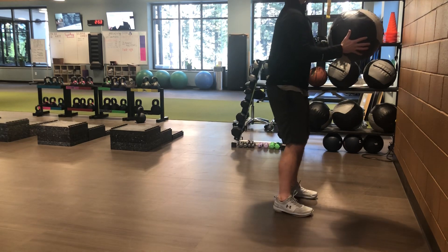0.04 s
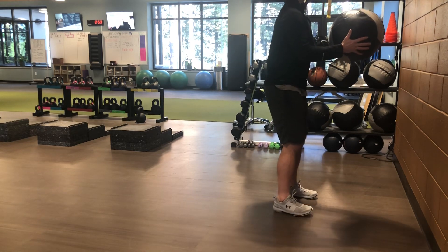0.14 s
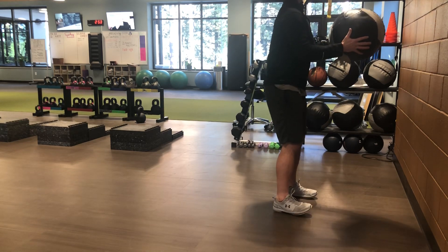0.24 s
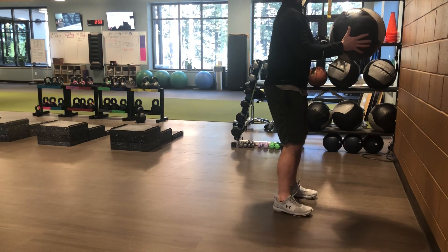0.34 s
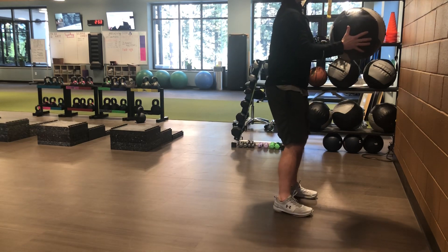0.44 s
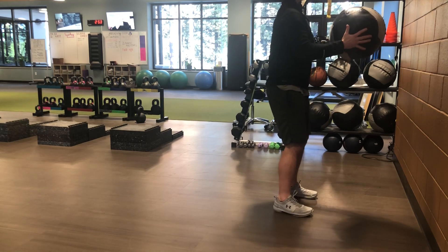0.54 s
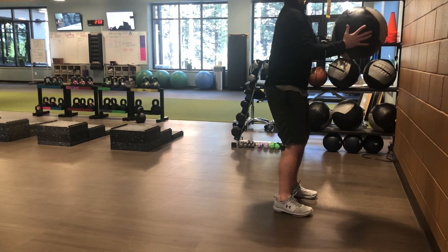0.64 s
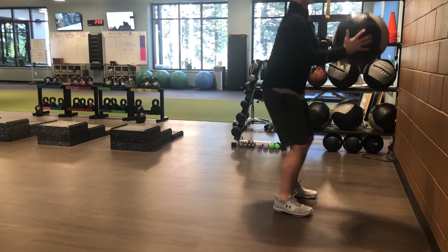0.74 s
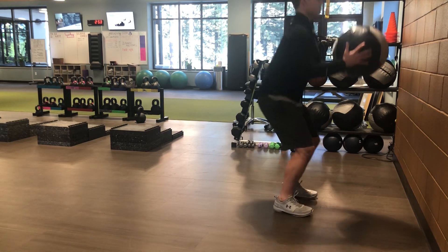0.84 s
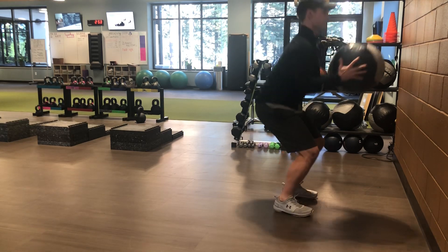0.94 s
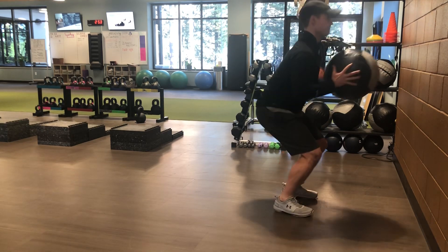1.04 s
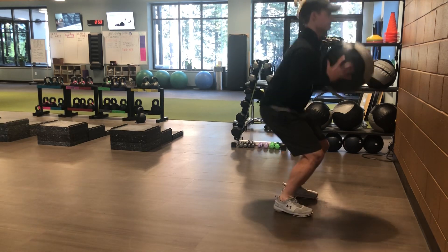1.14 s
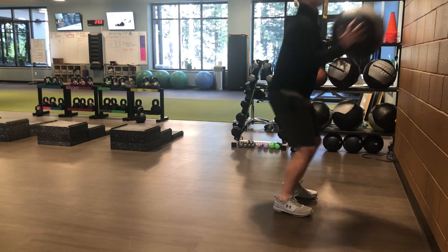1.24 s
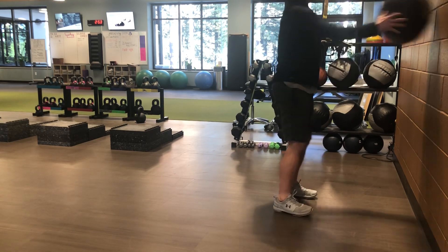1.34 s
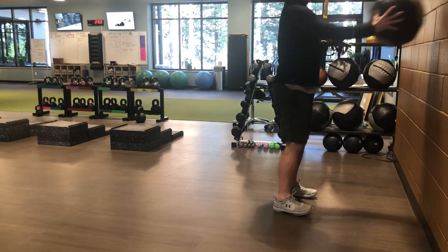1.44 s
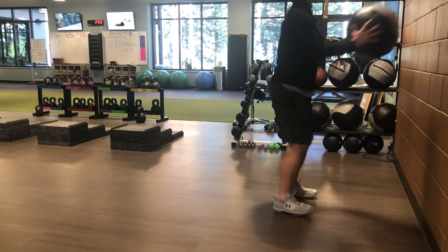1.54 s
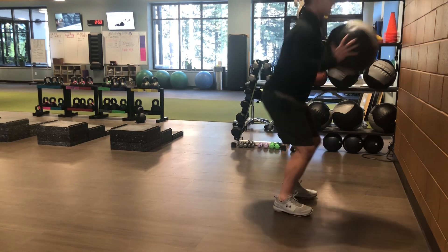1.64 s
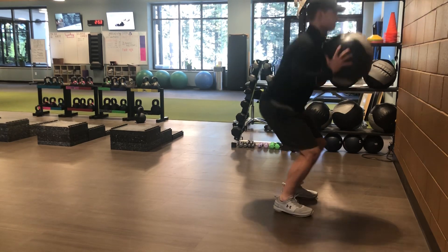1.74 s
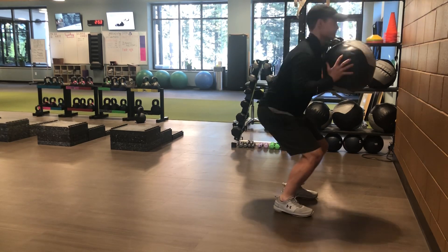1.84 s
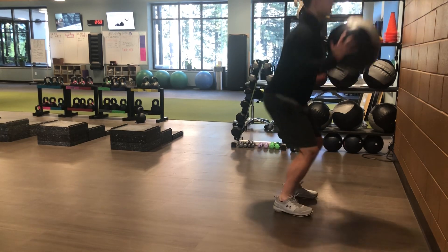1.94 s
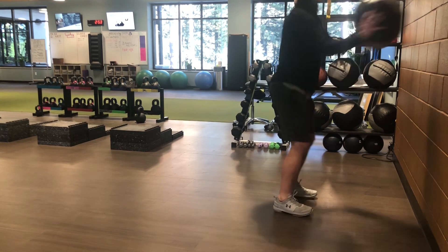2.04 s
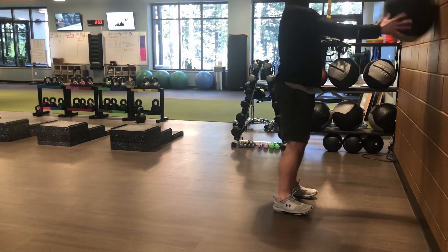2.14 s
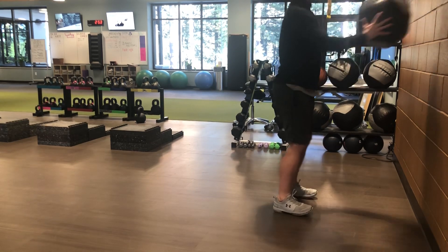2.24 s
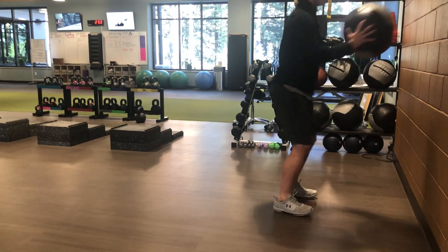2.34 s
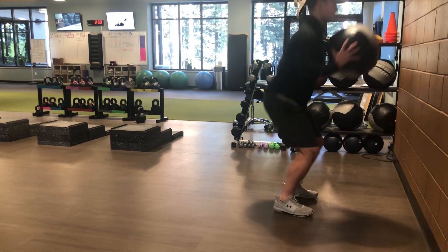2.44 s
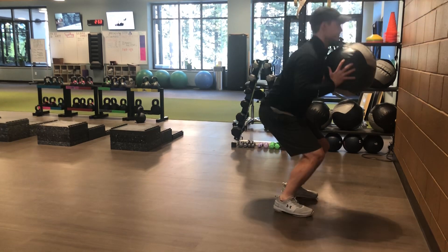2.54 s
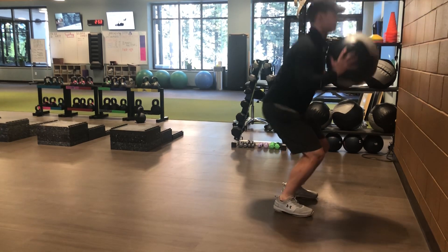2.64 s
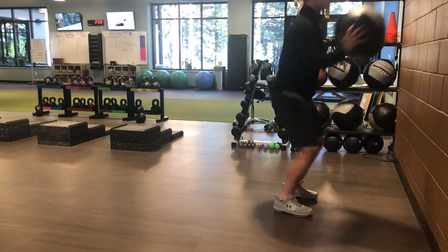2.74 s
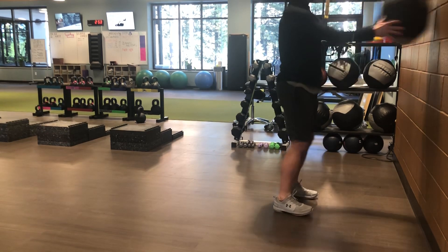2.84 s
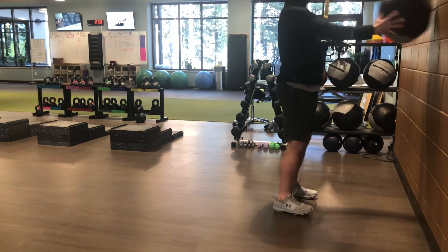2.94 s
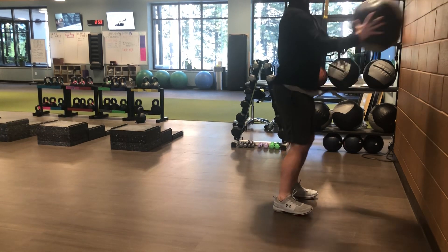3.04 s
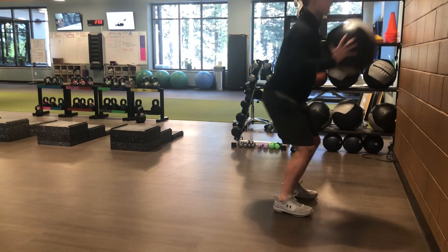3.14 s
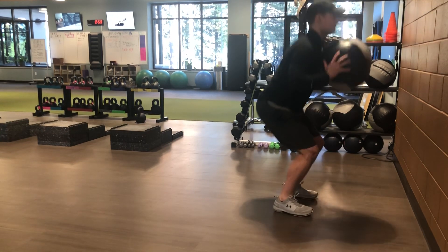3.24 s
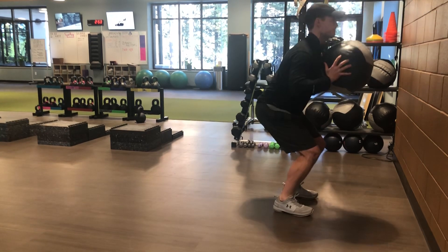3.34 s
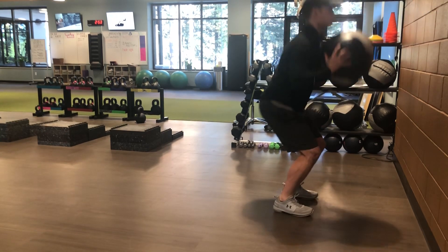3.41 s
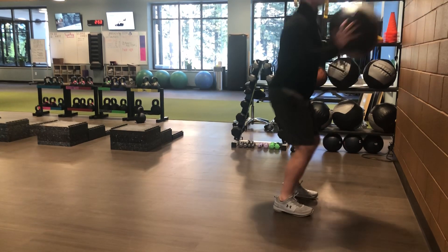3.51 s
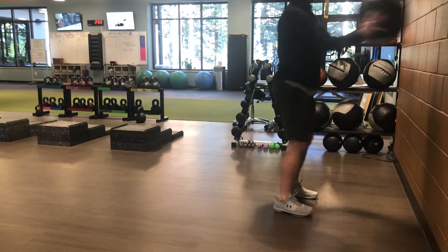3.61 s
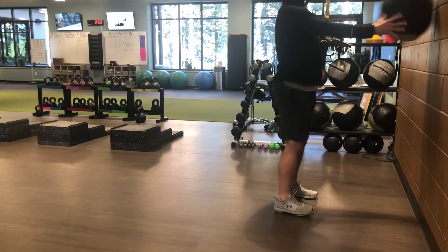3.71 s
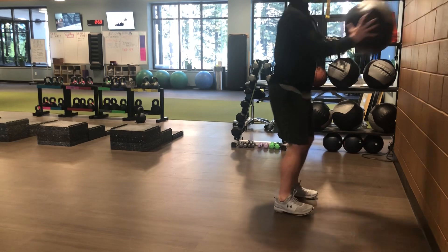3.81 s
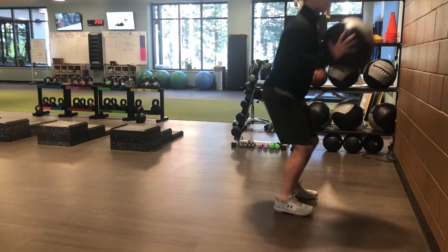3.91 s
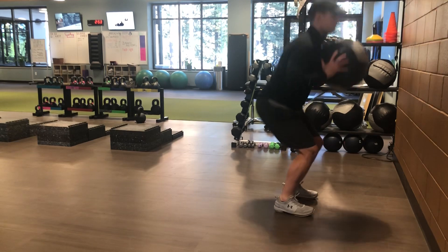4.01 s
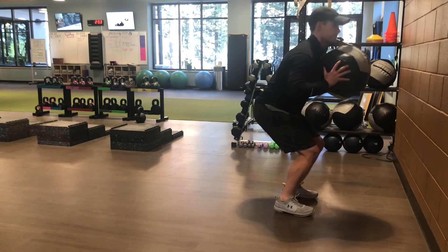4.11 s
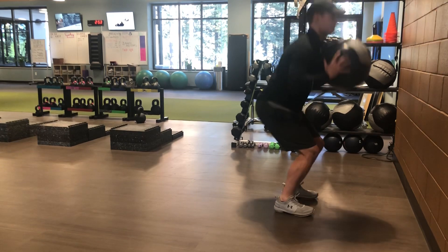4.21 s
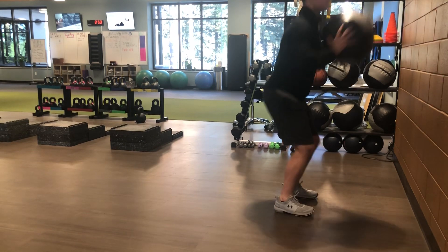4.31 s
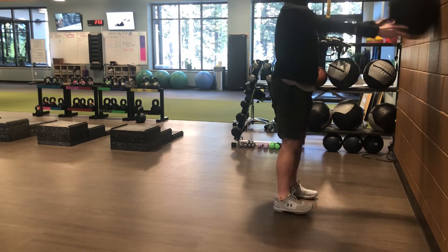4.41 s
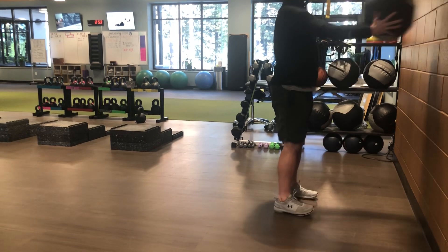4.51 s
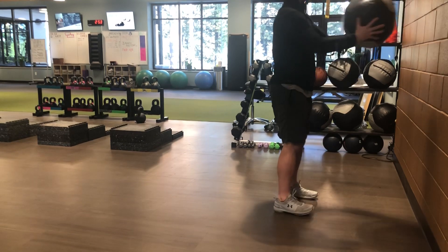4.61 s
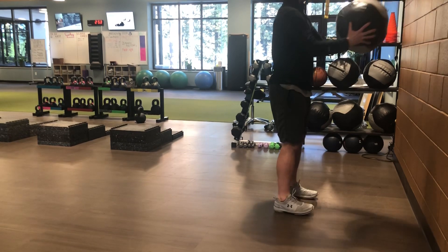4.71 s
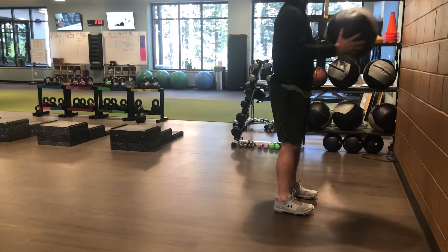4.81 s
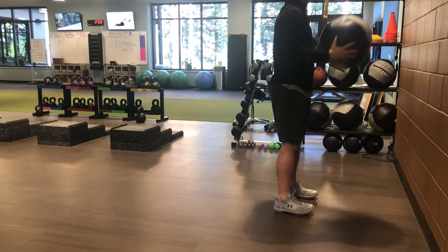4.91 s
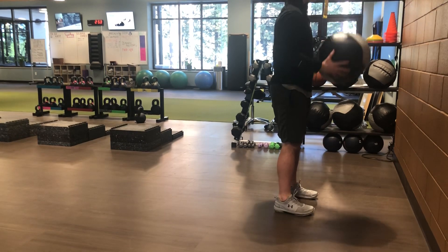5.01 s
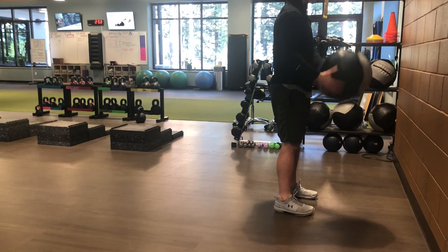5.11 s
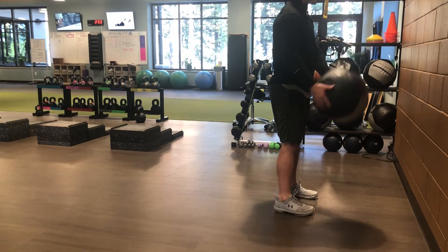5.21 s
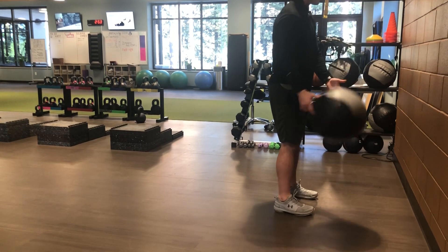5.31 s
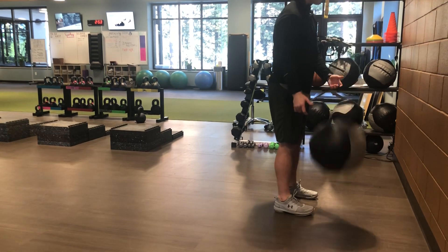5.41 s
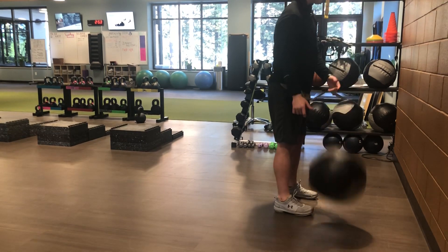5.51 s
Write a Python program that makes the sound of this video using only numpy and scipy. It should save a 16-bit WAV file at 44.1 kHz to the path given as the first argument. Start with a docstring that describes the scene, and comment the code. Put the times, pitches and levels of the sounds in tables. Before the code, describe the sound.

A heavy padded ball slaps against a wall five times in an echoing gym, over a steady ventilation hum.

```python
"""Medicine ball against a gym wall

One microphone in a gym, over the steady hum of the ventilation. A heavy padded ball is thrown five
times at a block wall and caught softly. Its cover slaps flat, ball and wall ring briefly, and the
filling lands with a low thud. Surfaces close by answer first, then the whole hall."""
import sys
import numpy as np
from scipy import signal
from scipy.fft import rfft, irfft, next_fast_len
from scipy.io import wavfile

SR = 44100
rng = np.random.default_rng(int(sys.argv[2]) if len(sys.argv) > 2 else 0)


def store_pcm(level_fs):
    """Save levels as 16-bit WAV."""
    pcm = np.round(np.clip(level_fs, -1, 1) * 32767).astype(np.int16)
    wavfile.write(sys.argv[1], SR, np.atleast_2d(pcm).T)


N = 245195


def amp(db):
    """Decibels to gain."""
    return 10 ** (np.asarray(db) / 20)


def unit(x):
    """x at rms 1."""
    return x / np.sqrt(np.mean(x ** 2) + 1e-20)


def along(points, hz):
    """Read (freq_hz, value) points on a log frequency axis."""
    freqs, values = np.transpose(points)
    return np.interp(np.log(hz + 1), np.log(freqs), values)


def add(track, start_s, sound):
    """Mix a sound into the track."""
    part = track[round(start_s * SR):][:len(sound)]
    part += sound[:len(part)]


def filtered(x, response):
    """Filter x by a gain given as a function of frequency."""
    size = next_fast_len(len(x) + 8192)
    return irfft(rfft(x, size) * response(np.fft.rfftfreq(size, 1 / SR)), size)[:len(x)]


def coloured(x, points, tilt_db=0, pop_hz=2000, pop_db=0, size=4096):
    """Causal colouring of unit power: (freq_hz, gain_db) points, a tilt per octave and one hump."""
    hz = np.fft.rfftfreq(size, 1 / SR)
    octaves = np.log2(np.maximum(hz, 200) / pop_hz)
    hump_db = pop_db * np.exp(-(octaves / 0.21) ** 2)
    gain = unit(amp(along(points, hz) + tilt_db * octaves + hump_db))
    cepstrum = irfft(np.log(gain + 1e-6))
    fold = np.r_[1, np.full(size // 2 - 1, 2), 1, np.zeros(size // 2 - 1)]
    minimum_phase = irfft(np.exp(rfft(cepstrum * fold)))
    return signal.fftconvolve(x, minimum_phase)[:len(x)]


def burst(envelope, size=2048):
    """A short toneless burst: noise under the envelope with its spectrum evened out."""
    spectrum = rfft(envelope[:size] * rng.standard_normal(size))
    even = irfft(spectrum / (np.abs(spectrum) + 1e-12)) * np.linspace(1, 0, size)
    return np.linalg.norm(envelope) * np.pad(even, (0, len(envelope) - size))


# Rush of air in the hall: freq_hz, relative_db
AIR_SPECTRUM = [(12, -60), (20, -23), (37, -10), (55, -11.5), (123, 0), (204, -6.5), (347, -10), (388, -11),
                (485, -14.5), (590, -10.5), (1150, -17.5), (1330, -17.5), (1960, -23.5), (3250, -26.5),
                (16000, -52)]
# Resonances of the ducts: centre_hz, width_hz, level_db
DUCT_BANDS = [(749, 33, -58.5), (1460, 320, -68), (3210, 140, -72)]
# Fan tones: pitch_hz, level_db
FAN_TONES = [(64.6, -52), (159, -55), (199, -55.5)]

def ventilation():
    """The room tone: rushing air, a few duct resonances and a wavering fan hum."""
    def noise(response):
        return unit(filtered(rng.standard_normal(N), response))

    def band(hz, width_hz):
        return noise(lambda f: 1 / (1 + (2 * (f - hz) / width_hz) ** 2))

    air = amp(-43.5) * noise(lambda f: amp(along(AIR_SPECTRUM, f)))
    ducts = sum(amp(db) * band(hz, width_hz) for hz, width_hz, db in DUCT_BANDS)
    hum = sum(amp(db) * band(hz, width_hz=11.7) for hz, db in FAN_TONES)
    return air + ducts + hum


# The thrower's movements: peak_s, half_length_s, level_db
CLOTHES_SWISHES = [(.995, .05, -67), (4.93, .05, -62.5), (5.104, 0.12, -72), (5.3, 0.091, -69),
                   (5.52, .033, -63)]

def clothes():
    """Fabric brushes as the thrower moves, very faint at the microphone."""
    t = np.arange(N) / SR
    motion = sum(amp(db) * np.exp(-((t - peak_s) / half_s) ** 2) for peak_s, half_s, db in CLOTHES_SWISHES)
    fabric = coloured(rng.standard_normal(N), [(800, -16), (3000, 8), (7500, 3), (15000, -11)])
    return motion * fabric


def slap(t, flat_s, force_db, room_db):
    """The loose cover crumples onto the wall, then cracks as the trapped air is squeezed out."""
    since_flat = np.maximum(t - flat_s, 0)
    rustle = amp(force_db - 16 - 60 * since_flat / 0.025) * (1 - np.exp(-t / 0.00054))
    crack_db = force_db - 3400 * flat_s  # the slower the cover flattens, the less the air cracks
    crack = amp(crack_db - 60 * since_flat / 0.0016) * (t >= flat_s)
    # The room gathers the slap from all directions, so it answers as to one impulse of equal energy.
    impulse = np.linalg.norm(rustle + crack) * (t == t[np.argmax(crack)])
    return bounced(burst(rustle + crack)) + amp(room_db) * gym(impulse)


# Resonances of the stretched cover: centre_hz, width_hz, gain_db
COVER_RESONANCES = [(1354, 92, -3), (2000, 55, -13), (2200, 54, -24), (3070, 130, -21), (3720, 170, -17),
                    (6280, 550, -13), (6960, 210, -9.5)]
# Broad tone of the cover's slap: freq_hz, relative_db
COVER_SPECTRUM = [(60, -41), (170, 2), (330, 3.5), (520, 2.5), (850, 3.5), (1300, 1), (1700, 0), (2200, 1),
                  (4000, -0.5), (4700, -1), (6900, -2.5), (8000, -5.5), (12500, -6.5), (15000, -9.5)]

def cover_tone(x, tilt_db, pop_hz):
    """The stretched cover lifts a few narrow bands and colours the slap; the air pop adds a hump."""
    resonances = sum(amp(db) * signal.lfilter(*signal.iirpeak(hz, hz / width_hz, fs=SR), x)
                     for hz, width_hz, db in COVER_RESONANCES)
    return coloured(x + resonances, COVER_SPECTRUM, tilt_db, pop_hz, pop_db=3)


# Single reflections off floor, thrower and racks: delay_s, gain_db
FIRST_REFLECTIONS = [(.0025, -9), (.0072, -14), (.0098, -15), (0.012, -19)]

def bounced(x):
    """The direct sound reaches the microphone with its first reflections just behind."""
    return x + sum(amp(db) * np.pad(x, (round(delay_s * SR), 0))[:len(x)]
                   for delay_s, db in FIRST_REFLECTIONS)


def echoes(x, gains, t60s, delay_s, build_s):
    """Diffuse reflections that set in after a delay and die at their own speed in each band."""
    hz, t, noise = signal.stft(rng.standard_normal(len(x)), SR, nperseg=256)
    t = np.maximum(t - delay_s, 0)
    fade = amp(-60 * t / along(t60s, hz)[:, None]) * (1 - np.exp(-t / build_s))
    fade = fade / np.sqrt(np.mean(fade ** 2, axis=1, keepdims=True) * len(x))
    tail = signal.istft(noise * fade, SR, nperseg=256)[1][:len(x)]
    tail = filtered(tail, lambda f: amp(along(gains, f)))
    return signal.fftconvolve(x, tail)[:len(x)]


# Wash off the near wall, floor and racks: freq_hz, gain_db
NEAR_SPECTRUM = [(50, -10), (170, 0), (350, 2), (900, 1.5), (2500, -5.5), (6000, -8.5), (15000, -5)]
# The hall's answer from further off: freq_hz, gain_db
HALL_SPECTRUM = [(50, -0.5), (150, 2.5), (330, 1.5), (800, 0), (2000, -6.5), (5000, -13), (15000, -17.5)]
# The hall's decay: freq_hz, t60_s
HALL_DECAY = [(60, 2.8), (250, 2.77), (800, 2.52), (2000, 1.33), (4500, 0.84), (8000, 0.51), (15000, 0.48)]

def gym(x):
    """A quick wash from nearby surfaces, then the long hall."""
    near_decay = [(100, 0.24), (1000, 0.22), (10000, 0.15)]
    near = echoes(x, NEAR_SPECTRUM, near_decay, delay_s=0.0038, build_s=0.0048)
    hall = echoes(x, HALL_SPECTRUM, HALL_DECAY, delay_s=0.042, build_s=0.0018)
    return near + hall


def knock(t, hz, db):
    """A dead, hollow knock, pitched by the size of the flattened patch; floor and room return it."""
    direct = amp(db - 60 * t / 0.022) * np.sin(2 * np.pi * hz * t) * (1 - np.exp(-t / 0.0028))
    floor_echo = np.interp(t - 0.0105, t, direct)
    return direct + amp(-7.5) * floor_echo + amp(-6.5) * gym(direct)


# Modes of ball and wall: pitch_hz, relative_db, t60_s
BALL_WALL_MODES = [(91.3, -18.5, 0.13), (128.6, -12, 0.15), (158.5, -7, 0.15), (200, -7, 0.11),
                   (271.4, -4, 0.083), (314.7, -5.5, 0.088), (390, -5, 0.029), (579, -8, 0.053),
                   (782, -10.5, 0.11), (954, -9, 0.076), (1290, -21, 0.041), (2000, -16, 0.11)]

def ring(t, ring_db):
    """Ball and wall ring in their modes, a little differently each time."""
    hz, db, t60_s = np.transpose(BALL_WALL_MODES)[:, :, None]
    detune, scatter_db, phase = rng.standard_normal((3, len(hz), 1))
    tones = np.sin(2 * np.pi * (hz * (1 + 0.0063 * detune) * t + phase))
    modes = amp(db + scatter_db - 60 * t / t60_s) * tones
    return amp(ring_db) * modes.sum(axis=0) * (1 - np.exp(-t / 0.0063))


def thud(t, hz, peak_s, width_s):
    """The heavy filling arrives after the cover: one slow push."""
    return np.exp(-((t - peak_s) / width_s) ** 2) * np.sin(2 * np.pi * hz * (t - peak_s))


def wall_boom(t, hz, t60_s):
    """The wall's low note swells and hangs on quietly."""
    envelope = amp(-60 * t / t60_s) * (1 - np.exp(-t / 0.019))
    return envelope * np.sin(2 * np.pi * (hz * t + rng.random()))


# Hits on the wall; flat_s is the time the cover takes to lie flat, weight_db how hard the filling lands:
# start_s, flat_s, force_db, tilt_db_per_octave, weight_db, pop_hz, knock_hz, knock_db
WALL_HITS = [(1.4038, .0038, -7, -0.97, -3.5, 2000, 324, -10),
             (2.156, 0.00058, 1.5, -0.5, 0.5, 2500, 402, -7), (2.9069, .0005, 2, -0.56, 3, 6200, 360, -6),
             (3.6806, .0021, 1, -.5, 2.5, 4300, 334, -6), (4.4574, 0.0055, 3, -0.45, 7, 1140, 424, -6.5)]

def throws():
    """Each throw is a slap, then a knock, a ring and a thud as the ball flattens, heard in the room."""
    track, t = np.zeros(N), np.arange(2 * SR) / SR
    body_lag_s = 0.001843  # the body sounds just after the cover lies flat
    for start_s, flat_s, force_db, tilt_db, weight_db, pop_hz, knock_hz, knock_db in WALL_HITS:
        room_db = -1.02 - 0.4 * force_db  # a harder slap stands further out of the room
        add(track, start_s, cover_tone(slap(t, flat_s, force_db, room_db), tilt_db, pop_hz))
        ring_db = -19 + 0.38 * weight_db  # the ring follows the weight only in part
        body = ring(t, ring_db) + amp(weight_db - 25) * thud(t, hz=64, peak_s=0.0168, width_s=0.0058)
        boom = amp(ring_db - 11) * wall_boom(t, hz=160, t60_s=0.66)
        landing = knock(t, knock_hz, knock_db) + body + amp(room_db - 1.5) * gym(body) + boom
        add(track, start_s + flat_s + body_lag_s, landing)
    return track


# After-slaps, relative to each hit's start and force: delay_s, relative_db, centre_hz
COVER_FLAPS = [(0.0117, -22, 1410), (0.0247, -25.5, 1080)]

def flaps():
    """The loose cover slaps again, short and papery, as the ball spreads and as it rebounds."""
    track, t = np.zeros(N), np.arange(SR // 2) / SR
    for start_s, _, force_db, *_ in WALL_HITS:
        for delay_s, db, hz in COVER_FLAPS:
            hump = [(hz / 8, -40), (hz / 2, -12), (hz, 0), (hz * 2, -12), (hz * 8, -28)]
            flap = coloured(burst(amp(db + force_db - 60 * t / 0.019)), hump)
            add(track, start_s + delay_s, flap + amp(-7) * gym(flap))
    return track


def catches():
    """After a short flight back from the wall, the ball stops in the hands with a dull bump."""
    t = np.arange(N) / SR
    return_s = 0.253
    return sum(amp(weight_db - 39) * thud(t, hz=85.5, peak_s=start_s + return_s, width_s=0.012)
               for start_s, _, _, _, weight_db, *_ in WALL_HITS)


# Hands meeting the cover: start_s, level_db
HAND_TOUCHES = [(2.5187, -41), (5.506, -54)]

def touches():
    """Faint ticks of the hands on the cover, with the gym behind them."""
    track, t = np.zeros(N), np.arange(SR // 2) / SR
    spectrum = [(500, -17), (3500, 12), (7500, 10), (15000, -18)]
    for start_s, db in HAND_TOUCHES:
        tick = coloured(burst(amp(db - 60 * t / 0.0082)), spectrum)
        add(track, start_s, tick + gym(tick))
    return track


def scene():
    """The ball, the thrower and the room's hum at one microphone."""
    return (throws() + flaps() + catches() + touches() + clothes() + ventilation())[None]


def record(dry):
    """The microphone drops the deepest bass, rounds off the highest peaks and cuts the extreme treble."""
    low_cut_hz, top_hz, ceiling = 36, 16000, 0.9
    x = signal.sosfilt(signal.butter(6, low_cut_hz, "highpass", fs=SR, output="sos"), dry[0])
    rounded = x / (1 + np.abs(x / ceiling) ** 4) ** (1 / 4)
    return filtered(rounded, lambda hz: 1 / (1 + (hz / top_hz) ** 120))[None]


dry = scene()
out = record(dry)
store_pcm(out)
```